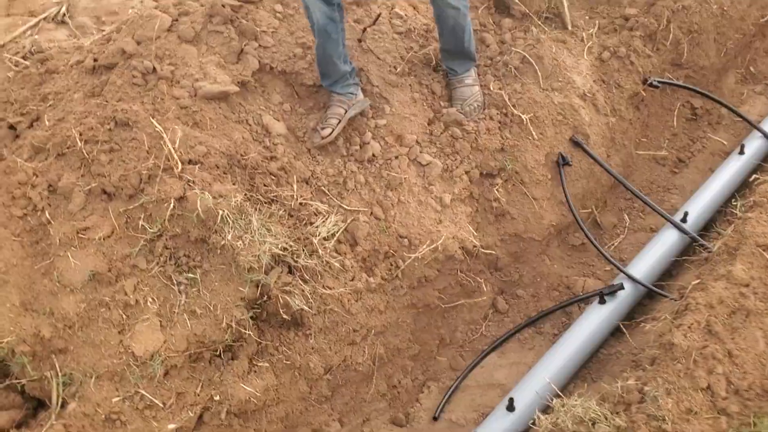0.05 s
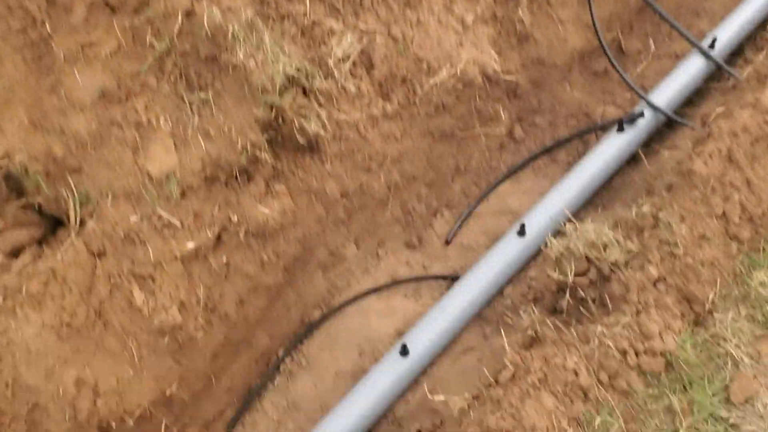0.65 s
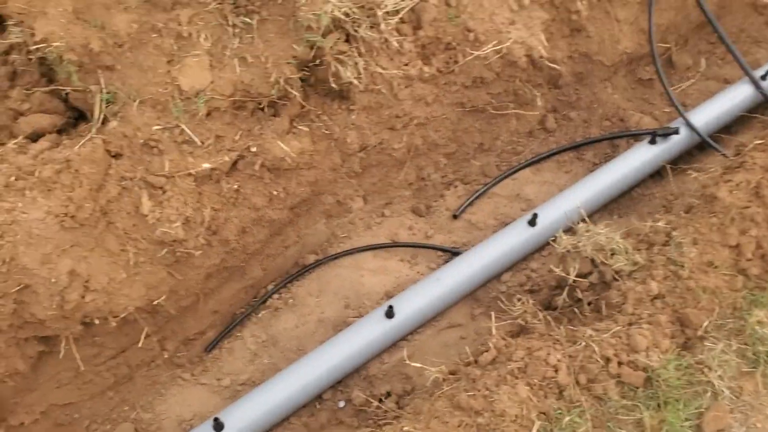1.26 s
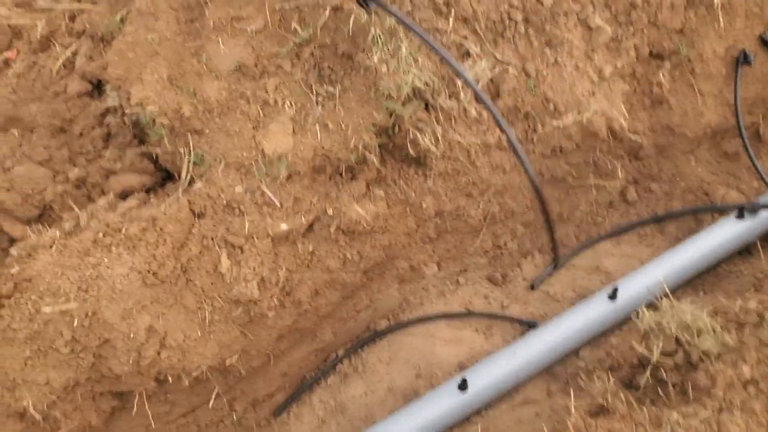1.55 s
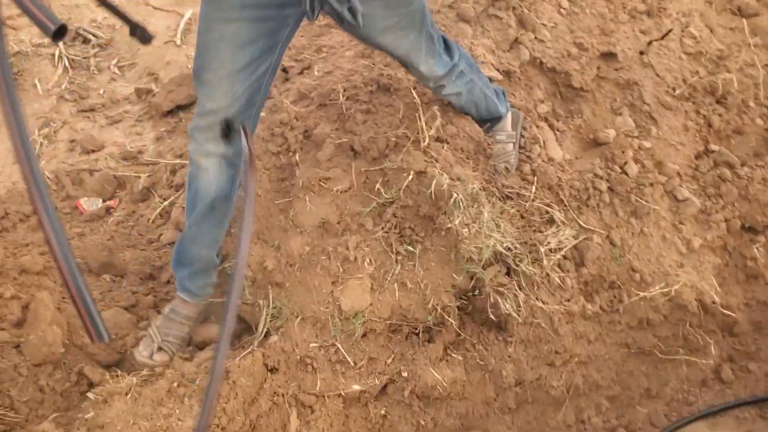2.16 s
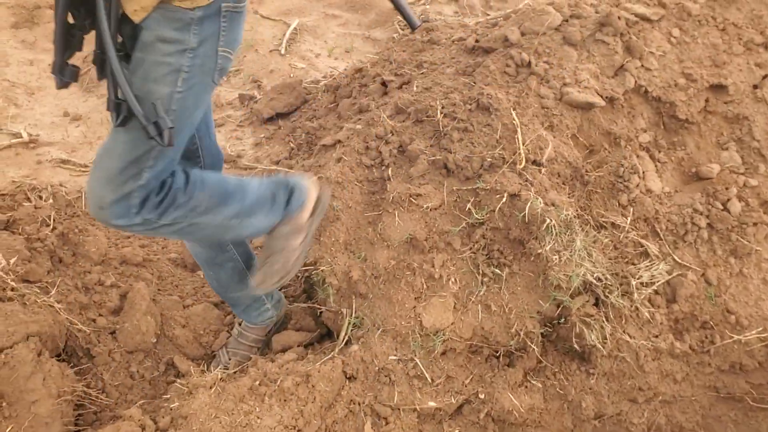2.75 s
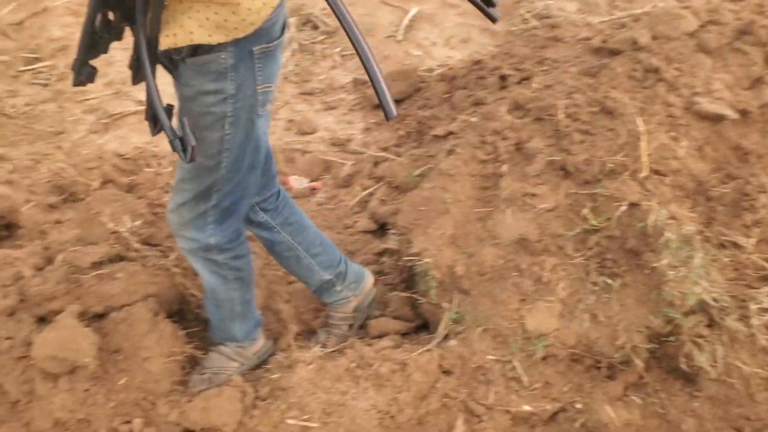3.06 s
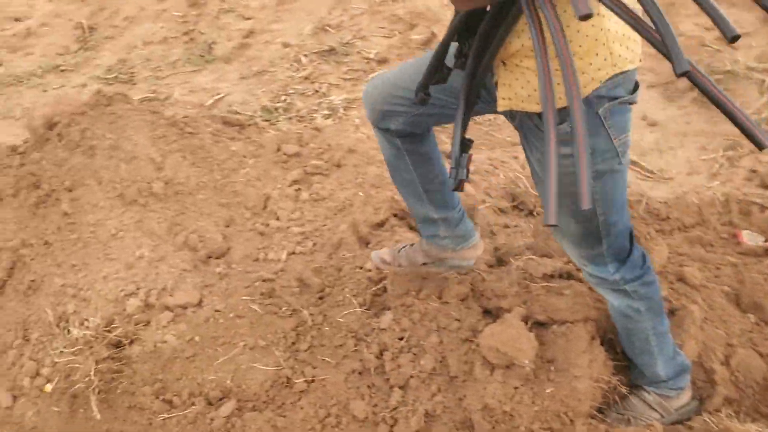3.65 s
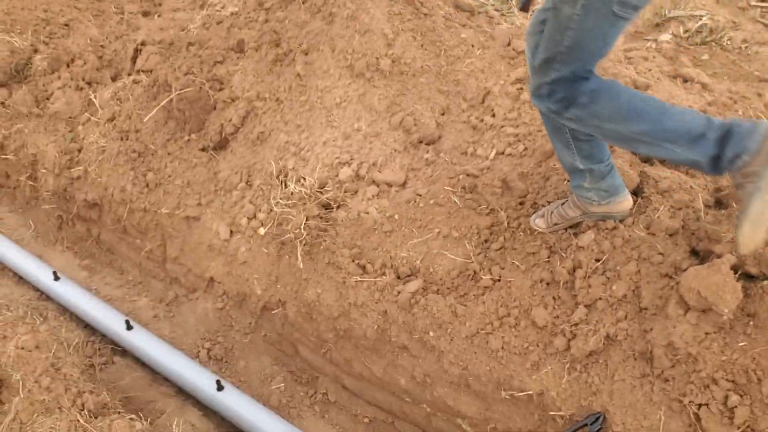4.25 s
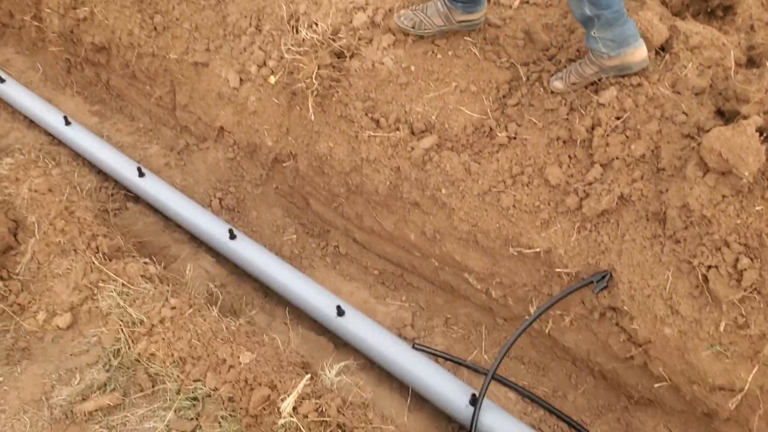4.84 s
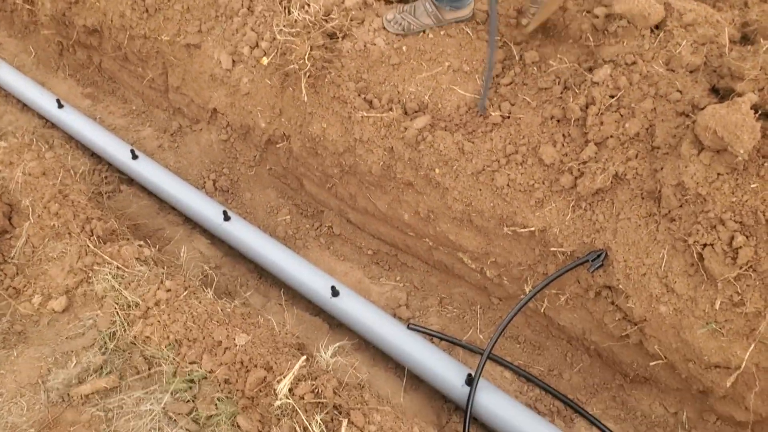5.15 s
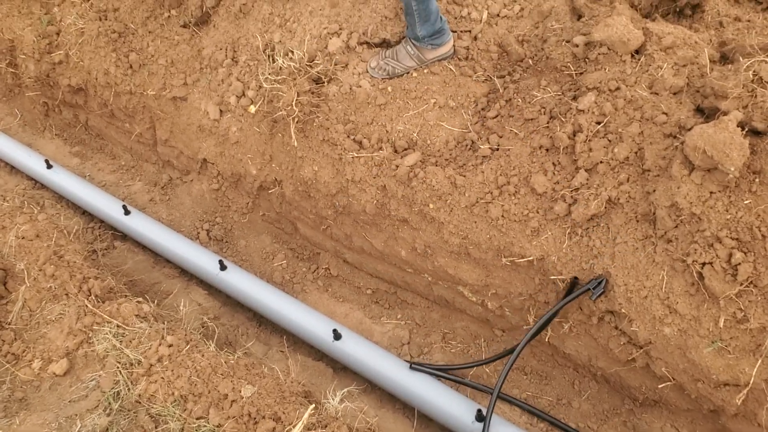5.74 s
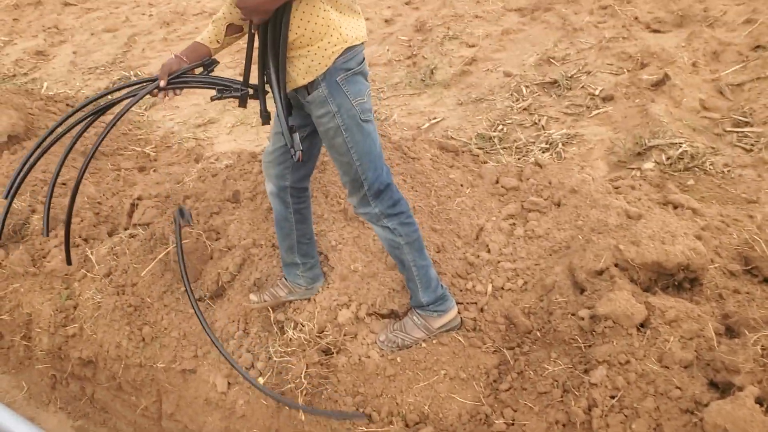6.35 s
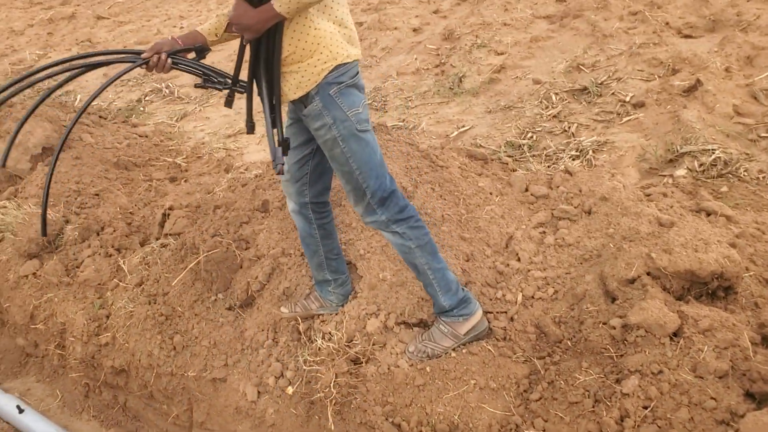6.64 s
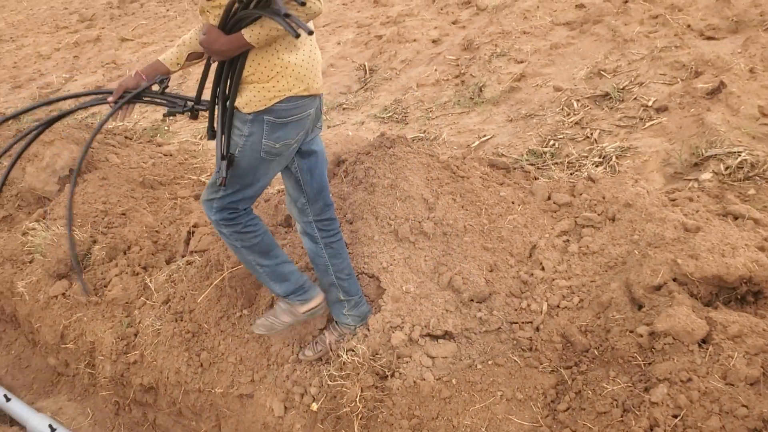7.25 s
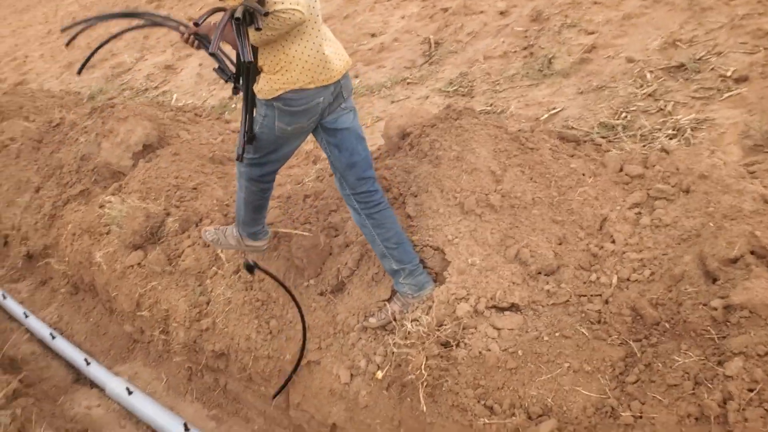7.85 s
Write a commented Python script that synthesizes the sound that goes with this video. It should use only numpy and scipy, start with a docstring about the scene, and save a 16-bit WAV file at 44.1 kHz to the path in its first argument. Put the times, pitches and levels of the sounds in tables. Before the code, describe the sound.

Wind buffets a phone microphone in an open, dry field, with a deep rumble on the left and a tearing flutter on the right. It starts in light puffs, swells into a strong gust, eases, then returns unevenly. Far beneath it, shoes scuff crumbly soil and carried plastic tubes rub and knock. Past the middle, a tube drops with faint ringing clicks and a brief scrape. There is no echo.

```python
"""Wind in a dry field

Gusts hit a phone's two microphone openings (ports): a deep rumble left, a tearing flutter right.
Under the wind, a worker crunches over crumbly soil with a bundle of plastic irrigation tubes.
The tubes rub and knock, and some drop with faint, ringing clicks.
The open field hisses softly, and there are no walls to echo."""
import sys
import numpy as np
from scipy import signal
from scipy.fft import rfft, irfft, next_fast_len
from scipy.io import wavfile
from scipy.ndimage import uniform_filter1d

SR = 44100
rng = np.random.default_rng(int(sys.argv[2]) if len(sys.argv) > 2 else 0)


def materialize(psi):
    """Save the field psi as 16-bit PCM at rate SR to the path in sys.argv[1].

    A 1-D psi becomes a single channel; in a 2-D psi each row is a channel.
    """
    bounded = np.clip(np.atleast_2d(psi).T, -1, 1)
    quanta = np.round(bounded * 32767).astype(np.int16)
    wavfile.write(sys.argv[1], SR, quanta)


N = 348390
TIME = np.arange(N) / SR
FFT_SIZE = 2 * next_fast_len(N // 2 + 1)
FREQS = np.maximum(np.fft.rfftfreq(FFT_SIZE, 1 / SR), 1)


def undb(db):
    """Turn decibels into a number to multiply by."""
    return np.exp(np.asarray(db) * np.log(10) / 20)


def unit(x):
    """Scale a signal to an average (rms) size of 1."""
    return x / np.sqrt(np.mean(x ** 2))


def curves(table):
    """Join a table's rows with straight lines in time, one curve per column."""
    times, *columns = np.transpose(table)
    return [np.interp(TIME, times, column) for column in columns]


def response(colour):
    """Turn a tone colour, given as (f/Hz, level/dB) points, into a gain at every frequency."""
    hz, db = np.transpose(colour)
    return undb(np.interp(np.log(FREQS), np.log(hz), db))


def shaped(x, gain):
    """Filter a signal by a gain at every frequency."""
    return irfft(rfft(x, FFT_SIZE) * gain)[..., :N]


def noise():
    """White noise: an even hiss."""
    return rng.standard_normal(N)


def wander(rate_hz):
    """A smooth random curve that strays about 1 from zero."""
    return unit(shaped(noise(), np.exp(-.5 * (FREQS / rate_hz) ** 2)))


def stereo_noise(gain, grains=1):
    """Separate filtered noise for each side, roughened by an optional loudness curve."""
    return np.array([unit(shaped(noise() * grains, gain)) for _ in range(2)])


def panned(x, pan_db):
    """Place a sound between the ports; pan is the left level minus the right."""
    return x * undb(np.array([[pan_db], [-pan_db]]) / 2)


def even(x, span_s):
    """Hold a signal's slow level at 1, keeping its quick bursts."""
    size = max(int(span_s * SR), 8)
    return x / np.sqrt(uniform_filter1d(uniform_filter1d(x ** 2, size), size) + 1e-12)


def swell(middle_s, length_s):
    """A bell-shaped rise and fall around one moment."""
    return np.exp(-2 * ((TIME - middle_s) / length_s) ** 2)


def puffs(depth_db, rate_hz):
    """Random changes of air speed, in dB; the air can drop a long way, but its peaks level off."""
    speed = wander(rate_hz)
    return depth_db * np.minimum(speed, 2 * np.tanh(np.maximum(speed, 0) / 2))


def surges(table, attack_s=0.0071, release_s=0.0093):
    """Each change in the air starts fast, holds and lets go; one curve per strength column."""
    change = np.zeros((len(table[0]) - 2, N))
    for start, length, *strengths in table:
        during = slice(int(start * SR), int((start + length + release_s) * SR))
        age = TIME[during] - start
        rise, fall = age / attack_s, 1 - (age - length) / release_s
        change[:, during] += np.outer(strengths, np.clip(np.minimum(rise, fall), 0, 1))
    return change


def rumble(colour, level_db, span_s):
    """Large swirls of air push slowly on a port, in uneven lumps."""
    lumps = undb(1.38 * wander(26))
    pressure = even(shaped(noise(), response(colour)), span_s)
    return unit(pressure * lumps) * undb(level_db)


def eddies(colour, level_db, slope_db, burst_db, burst_hz, flutter_db, flutter_hz, knee_hz):
    """Small swirls (eddies) come in bursts; above the knee, the treble falls by slope_db per octave."""
    bursts = even(noise() * undb(puffs(burst_db, burst_hz)), span_s=0.028)
    spectrum = rfft(bursts, FFT_SIZE) * response(colour)
    slope_db = np.minimum(slope_db, 0)
    flutter = puffs(flutter_db, flutter_hz)
    above_knee = np.clip(np.log2(FREQS / knee_hz), 0, 4)  # in octaves
    rush = 0
    for octave in np.arange(9) / 2:  # overlapping bands; the lowest holds all below the knee
        share = np.maximum(1 - 2 * np.abs(above_knee - octave), 0)
        band_db = slope_db * octave + flutter * min(octave, 2)  # the finest eddies flutter together
        rush = rush + irfft(spectrum * share)[:N] * undb(band_db)
    core = irfft(spectrum * ((FREQS > 250) & (FREQS < 600)))[:N]  # this band sets the level
    return rush / np.std(core) * undb(level_db)


REFERENCE_DB = -30.5  # eddies louder than this get brighter, quieter ones duller
# Tone colours of the rumble and the eddies on the left: f/Hz, level/dB
LEFT_RUMBLE_COLOUR = [(15, -28.5), (30, -33.5), (48, -1.5), (68, 0.5), (95, -2.5), (135, -9), (200, -18.5),
                      (320, -26), (600, -95)]
LEFT_EDDY_COLOUR = [(90, -25.5), (160, 8), (230, 5.5), (320, 0), (450, -3), (700, 2.5), (1100, 4.5),
                    (2000, -4.5), (4000, -33), (8000, -59)]
# Slow strength of the wind on the left: t/s, rumble level/dB, eddy level/dB
LEFT_STRENGTH = [(0.11, -27, -34), (1.154, -28, -39.5), (1.715, -20.5, -30), (2.477, -18.5, -39),
                 (2.798, -17, -26), (3.339, -22.5, -41.5), (3.481, -27, -50), (3.683, -19.5, -32.5),
                 (4.078, -25.5, -41), (5.309, -15, -33), (5.684, -23.5, -37.5), (6.14, -14.5, -29.5),
                 (6.528, -23.5, -49.5), (6.717, -18, -33.5), (7.401, -22, -44), (7.896, -11.5, -33)]


def left_wind(rumble_lift, eddy_lift, drop_db, slope_db):
    """Air rumbles deeply on the left port; faster air sheds finer eddies and sounds brighter."""
    rumble_db, eddy_db = curves(LEFT_STRENGTH)
    puff_db = puffs(depth_db=1.97, rate_hz=20) - drop_db
    eddy_db = eddy_db + eddy_lift + puff_db
    slope_db = slope_db + 0.27 * (eddy_db - REFERENCE_DB)
    low = rumble(LEFT_RUMBLE_COLOUR, rumble_db + rumble_lift + puff_db, span_s=0.046)
    return low + eddies(LEFT_EDDY_COLOUR, eddy_db + 0.65, slope_db, burst_db=5.5, burst_hz=69,
                        flutter_db=3.5, flutter_hz=35, knee_hz=376)


# Tone colours of the rumble and the eddies on the right: f/Hz, level/dB
RIGHT_RUMBLE_COLOUR = [(15, -24), (30, -25.5), (50, -0.5), (75, 4), (110, -8.5), (160, -4.5), (240, -10.5),
                       (400, -23.5), (700, -68)]
RIGHT_EDDY_COLOUR = [(90, -50), (160, -26.5), (230, -6.5), (320, 1), (450, 1.5), (700, 2), (1100, -0.5),
                     (1700, -5), (3850, -13.5), (4300, -19.5), (5200, -25.5), (8000, -44)]
# Slow strength of the wind on the right: t/s, rumble level/dB, eddy level/dB
RIGHT_STRENGTH = [(0.113, -45, -33.5), (0.696, -59, -35), (1.06, -42, -36), (1.468, -48, -30.5),
                  (1.479, -18, -18), (1.58, -20.5, -13.5), (1.65, -23.5, -15.5), (2.04, -29.5, -20),
                  (2.13, -25.5, -19), (2.46, -23.5, -19.5), (2.56, -27, -25), (2.77, -20.5, -21),
                  (2.93, -28.5, -26), (3.132, -32, -25), (3.362, -28.5, -21), (3.47, -35, -21),
                  (3.53, -31, -26), (3.752, -33, -33.5), (4.086, -35.5, -43), (5.066, -34.5, -39),
                  (5.14, -27, -30.5), (5.265, -29, -22), (5.524, -28.5, -30.5), (5.63, -37, -41),
                  (5.8, -61, -61), (5.83, -40, -48), (5.98, -29, -34.5), (6.02, -37, -31.5),
                  (6.627, -35.5, -36), (6.83, -25.5, -26), (6.95, -27, -25), (7.5, -30, -27.5),
                  (7.902, -34, -30)]
# Soft, low puffs that come one by one in light air: middle t/s, length/s, level/dB
LOW_PUFFS = [(0.107, 0.049, -26), (0.222, 0.028, -22), (0.275, 0.046, -32), (0.33, 0.029, -30),
             (0.513, 0.03, -31), (0.585, 0.0083, -30), (0.794, .012, -31), (0.89, .025, -28),
             (0.923, 0.065, -34), (1.006, 0.014, -25), (1.068, 0.016, -20), (1.11, 0.026, -29),
             (1.21, 0.061, -34), (1.33, 0.02, -22)]
# Light air puffs and crackles, a strong gust rushes: t/s, puff depth/dB, flutter/(dB per octave)
AIR_UNSTEADINESS = [(.2, 1, 2.2), (1.44, 4, 1.3), (1.5, -0.35, 0.9), (2.4, 0.5, 1.4), (2.7, 0.5, 2.6),
                    (3.35, 0.9, 1.0), (4.1, 0, 7.5), (6.6, 0, -2.8), (6.9, 1.2, 2), (7.7, 1.5, 2.5)]


def right_wind(lift_db, slope_db, rasp):
    """Air tears and flutters across the right port; a rasp makes it both brighter and louder."""
    rumble_db, eddy_db = curves(RIGHT_STRENGTH)
    depth_db, flutter_db = curves(AIR_UNSTEADINESS)
    eddy_db = eddy_db + lift_db
    slope_db = slope_db + rasp + 0.28 * (eddy_db - REFERENCE_DB)
    puff_db = puffs(depth_db, rate_hz=11)
    push = undb(rumble_db) + sum(undb(db) * swell(s, length) for s, length, db in LOW_PUFFS)
    low = push * rumble(RIGHT_RUMBLE_COLOUR, lift_db + puff_db, span_s=0.011)
    eddy_db = eddy_db + puff_db + 0.65 * rasp
    return low + eddies(RIGHT_EDDY_COLOUR, eddy_db, slope_db, burst_db=3, burst_hz=210,
                        flutter_db=flutter_db, flutter_hz=140, knee_hz=422.4)


# Short shoves of air: start t/s, length/s, left rumble lift/dB, left eddy lift/dB, right lift/dB
GUSTS = [(.1, 0.027, 1.5, -1, 8.5), (.247, 0.026, 4, 5.5, 7), (.842, 0.17, 2, -1, 2),
         (.9, 0.043, -11, 9, 2.5), (1.105, 0.043, -2, 6.5, 3), (1.311, 0.045, 8.5, 0, 0),
         (1.551, 0.12, 5.5, 4, -2.5), (2.05, 0.066, 3, 8, 2.5), (2.526, 0.053, 7, 8, 3),
         (2.746, 0.16, 3.5, 3, -1.5), (2.982, 0.028, -10, 9.5, -0.5), (3.153, 0.043, 7, 13.5, 2.5),
         (3.251, 0.049, 8, 1, 0), (3.865, 0.066, 3.5, 11, 2), (4.225, 0.21, 2, 9, 1.5),
         (4.235, .1, 5, 1.5, 0), (4.647, 0.16, 4.5, 7, 8.5), (4.917, 0.11, 5.5, 5, 1),
         (5.1, 0.037, 1.5, 8.5, 4.5), (5.298, 0.055, 4, -4, -3), (5.577, 0.06, 5, 6, -4),
         (5.805, 0.03, -2, 11, 8), (5.985, 0.051, -6, -7, 3.5), (6.055, 0.057, 3, -6, -2.5),
         (6.118, 0.21, 1.5, 3, 6), (6.22, 0.015, -6, -5, 8), (6.28, 0.052, -1.5, 7.5, 3.5),
         (6.709, 0.054, 6, 1, -1.5), (7.135, 0.048, 10.5, 7, -1.5), (7.28, 0.039, 5.5, -4, -0.5),
         (7.63, 0.076, 3.5, 11, 1.5), (7.712, 0.062, -1.5, 4, 8)]
# Moments when the air lets go: start t/s, length/s, left drop/dB, right drop/dB
AIR_LULLS = [(.16, 0.1, 5.5, 6.5), (.292, 0.021, 7, 8), (.575, 0.023, 12, 5.5), (.597, .045, 1, 1),
             (.872, 0.013, -1, 12), (.975, 0.08, 3, 3), (1.036, 0.069, 3, 6), (1.152, 0.0094, 4, 2),
             (1.24, 0.037, 6, 4), (1.352, 0.011, 1, 14), (1.617, 0.0093, 1, 2), (2.046, 0.016, 3, 5.5),
             (2.505, 0.014, -2, 11), (3.135, 0.021, 4, 4), (3.585, .008, 0, 5), (4.043, 0.047, 6.5, 5.5),
             (4.805, 0.11, 1, -4), (4.862, 0.058, 12, 3), (5.05, 0.036, 6, 1), (5.34, 0.036, 5.5, 8),
             (5.505, 0.058, 8, -3), (5.77, 0.039, -1.5, 3), (5.9, 0.074, 1.5, 9), (6.332, 0.03, 0, 6),
             (7.59, 0.038, 2, -3.5), (7.782, 0.02, 13.5, 1)]
# Rasps as fast air tears past; a lift below zero dulls the sound:
# start t/s, length/s, left slope lift/(dB per octave), right slope lift/(dB per octave)
AIR_RASPS = [(.396, 0.028, 4, 3.5), (.452, 0.013, 6, 2), (.483, 0.02, 8, 1), (.7, .016, 2, 2.5),
             (.74, .03, 2, 2), (0.852, 0.014, 8, 5), (.945, 0.007, 9, 1.5), (1.116, 0.028, 9.5, 0),
             (1.373, 0.0074, 3, 2), (1.425, 0.026, 1, 1.5), (1.474, 0.0025, 0, 2.5),
             (1.535, .028, -6, 1.34), (1.71, 0.033, -1, 0.56), (1.768, 0.029, 6, 1.5),
             (1.815, 0.015, -1, 1.5), (1.929, 0.025, -1, 2.5), (2.02, 0.015, 0, 2.6),
             (2.07, 0.039, 10.5, -2), (2.22, 0.016, -7, 2), (2.256, .02, -3, 0.5), (2.35, 0.023, -4, 0.5),
             (2.609, 0.012, 0, 3), (2.748, 0.1, 1, 4.5), (2.869, 0.014, 2, 5.5), (2.888, .006, 4, 6),
             (2.918, 0.015, 0, 2.5), (3.003, 0.013, 9.5, 4.5), (3.046, 0.027, 3, 3.5),
             (3.233, 0.032, -3, 1), (3.331, 0.018, 7, 4.5), (3.35, 0.0068, -4, 5.5), (3.4, .014, 10, 2.5),
             (3.424, 0.0073, 9, 2.5), (3.452, 0.0041, 10, 3.5), (3.574, 0.0087, -2, 4.5),
             (3.601, 0.037, -5, 3), (3.645, 0.0046, 0, 5.5), (5.805, .045, -2.5, 3), (7.713, 0.025, -2, 4),
             (7.812, 0.018, -8, 5)]
# How steeply the treble falls as the phone turns: t/s, left/(dB per octave), right/(dB per octave)
TREBLE_SLOPE = [(.28, -16.5, -15), (.45, -17.5, -10), (.73, -18, -8), (.88, -20.5, -14.5),
                (1.03, -16.5, -13), (1.25, -20, -10), (1.45, -20.5, -11.5), (1.9, -30, -10.5),
                (2.42, -22, -12), (2.56, -17, -15), (3.1, -21.5, -16.5), (3.2, -24, -12), (3.4, -17, -12),
                (4.4, -25.5, -20), (5.3, -25.5, -21), (7.6, -18, -18), (7.73, -20, -20)]


def wind():
    """Each port sits in its own swirling air; gusts, lulls and rasps ride on a slow flow."""
    rumble_lift, eddy_lift, right_lift = surges(GUSTS)
    left_drop, right_drop = surges(AIR_LULLS)
    left_rasp, right_rasp = surges(AIR_RASPS, attack_s=0.0015, release_s=0.0015)
    left_slope, right_slope = curves(TREBLE_SLOPE)
    left = left_wind(rumble_lift, eddy_lift, left_drop, left_slope + left_rasp)
    right = right_wind(right_lift - right_drop, right_slope, right_rasp)
    return np.array([left, right])


# Loudness of the field's hiss on the right: t/s, level/dB
GRASS_LEVEL = [(.11, -62.5), (1.2, -75), (3.6, -58), (4.3, -59), (5.1, -52), (5.7, -53), (7.0, -50.5),
               (7.9, -52.5)]
# Tone colour of that hiss: f/Hz, level/dB
GRASS_COLOUR = [(100, 9.5), (600, -10), (1400, 1), (2200, 1.5), (3000, 2), (3900, -3), (4900, -4.5),
                (6500, -11.5), (9000, -14), (12000, -18), (16000, -4)]


def field_hiss(left_db, flicker_db):
    """Air hisses softly over dry grass all around, stronger on the right."""
    level_db, = curves(GRASS_LEVEL)
    colour = response(GRASS_COLOUR)
    air = np.array([unit(shaped(noise(), colour)) * undb(flicker_db * wander(11)) for _ in range(2)])
    return air * undb(level_db) * undb([[left_db], [0]])


def microphone_hiss():
    """Each microphone makes a faint, steady hiss of its own."""
    return np.array([noise(), noise()]) * undb([[-78], [-69]])


TUBE_PITCH_HZ = 3010  # pitch of the tube below; shorter and longer tubes scale from here
# The tones at which a plastic tube rings while held in the bundle: f/Hz, width/Hz, level/dB
TUBE_TONES = [(1570, 540, 6), (2920, 1460, 11), (4240, 300, 0.5), (6200, 590, -16)]


def tube_body(hz, pitch_hz=TUBE_PITCH_HZ, ring=1):
    """A tube acts as a filter that favours its own tones; narrower tones ring longer."""
    return sum(undb(db) / (1 + 2j * (hz - f * pitch_hz / TUBE_PITCH_HZ) * ring / width)
               for f, width, db in TUBE_TONES)


# Tubes knocking together and landing:
# t/s, knock level/dB, tick level/dB, pan/dB, pitch f/Hz, ring time/(that of a held tube)
TUBE_HITS = [(0.162, -38, -53, -6, 2690, 1), (1.032, -59, -72, -9, 3080, 8),
             (1.587, -61, -51.5, -2, 2940, 1), (1.757, -70, -47.5, -3, 2920, 1),
             (2.417, -50, -55.5, 13, 2940, 1), (2.526, -40.5, -45.5, -2, 4050, 1.5),
             (2.767, -41, -50, -2, 2940, 1), (2.806, -44, -50, 9, 2940, 1), (2.818, -50, -55, 7, 2940, 1),
             (3.433, -43, -52, -3, 4700, 3), (3.462, -43, -51, -3, 4600, 3), (3.822, -53, -57, -2, 3000, 1),
             (3.993, -52, -53, -9, 2960, 2), (4.279, -59, -63, 3, 2940, 1), (5.176, -46, -64, -6, 3130, 3),
             (5.237, -44.5, -56, -9, 4200, 1.2), (5.246, -39, -59, -6, 3540, 2.5),
             (5.3, -56, -56, -15, 4470, 2), (5.359, -53, -61, -18, 2940, 1),
             (5.426, -49, -56, -18, 3940, 1), (5.444, -36.5, -54, -6, 3070, 14),
             (5.461, -42, -65, 3, 2940, 2), (5.584, -40, -52, -1, 2930, 4), (5.63, -47, -53, 12, 2860, 2),
             (5.644, -46, -52, 6, 2850, 1), (5.691, -45, -62, 2, 2900, 1.5), (5.842, -48, -72, -9, 2960, 7),
             (6.525, -43, -60, -6, 3100, 2), (6.559, -51, -66, -13, 3200, 3),
             (6.702, -40.5, -53, 2, 5200, 1), (6.709, -47, -57, -1, 5700, 1), (6.769, -51, -65, 1, 2920, 1),
             (6.792, -45.5, -64, 1, 2940, 1), (6.842, -46.5, -54, -5, 4800, 1.5),
             (6.878, -41.5, -53, -1, 2800, 4), (7.005, -51, -70, -4, 2780, 6),
             (7.081, -50, -67, 10, 2740, 4), (7.255, -45.5, -74, 2, 2860, 4)]


def tube_clicks(knock_s, tick_s, knock_trim_db, tick_trim_db):
    """Each hit rings a tube at its own pitch, longer if it lies free, and adds a gritty tick."""
    t = TIME[:8192]
    hz = np.fft.rfftfreq(len(t), 1 / SR)
    snap = 1 + undb(-1) * np.exp(-t / 0.00096)  # the first hard touch
    treble_only = (1j * hz / (5000 + 1j * hz)) ** 2
    onset = t < .008  # the first 8 ms set the level
    clicks = np.zeros((2, N + len(t)))
    for s, knock_db, tick_db, pan_db, pitch_hz, ring in TUBE_HITS:
        contact, grit = rng.standard_normal((2, 2, len(t))) * snap
        knock = irfft(rfft(contact * np.exp(-t / knock_s)) * tube_body(hz, pitch_hz, ring))
        tick = irfft(rfft(grit * np.exp(-t / tick_s)) * treble_only)
        knock *= undb(knock_db + knock_trim_db) / np.std(knock[:, onset])
        tick *= undb(tick_db + tick_trim_db) / np.std(tick[:, onset])
        start = int(s * SR)
        clicks[:, start:start + len(t)] += panned(knock + tick, pan_db)
    return clicks[:, :N]


# Single large eddies that hit the ports:
# t/s, left push level/dB, width/ms, right minus left/dB, damping (more stops the ringing sooner)
AIR_SLAPS = [(0.271, -12.5, 0.72, 1, 0.69), (0.926, -18, 0.65, 6, 1), (1.127, -12, 0.85, 0.5, 0.98),
             (2.812, -1, 0.17, -21, 1), (3.159, -5.5, 0.4, -32, 1), (4.787, -4, 0.78, -18, 0.89),
             (5.925, 1.5, 0.41, -25, 1), (5.979, -8.5, 0.48, -32, 0.73), (7.141, -4, 3, -29, 0.39),
             (7.664, -3.5, 2.4, -33, 0.27), (7.857, -11, 0.36, -28, 0.89)]


def wind_slaps(ring_hz):
    """A pulse of air hits the ports; the microphone's bass cut makes it swing back and ring."""
    w = 1j * FREQS / ring_hz
    slaps = 0
    for s, db, width_ms, right_db, damping in AIR_SLAPS:
        push = np.exp(-.5 * ((TIME - s) * 1000 / width_ms) ** 2)
        bass_cut = w ** 2 / (w ** 2 + damping * w + 1)
        slaps = slaps + undb([[db], [db + right_db]]) * shaped(push, bass_cut)
    return slaps


# Shoes scuffing dry soil: middle t/s, length/s, level/dB, pan/dB
SHOE_SCUFFS = [(1.303, 0.49, -64, -15), (2.167, 0.025, -54, -4), (2.341, 0.054, -50, -3),
               (2.493, 0.066, -49.5, -4), (2.79, 0.14, -54, -8), (3.033, 0.066, -51, -7),
               (4.118, 0.19, -58, -5), (5.055, 0.24, -59, 1), (5.374, .02, -52, -14),
               (5.439, 0.02, -42.5, -12), (5.526, 0.062, -53, -16), (6.92, 0.3, -55.5, -4),
               (7.587, 0.11, -55, -8)]


def shoes(grain_db, trim_db):
    """Crumbs of soil crush under a sole: a swell of tiny dry grains."""
    colour = response([(300, -21.5), (1500, 13), (4000, 6.5), (7000, 1), (12000, -3), (16000, 17)])
    grit = stereo_noise(colour, grains=undb(grain_db * wander(500)))
    return grit * sum(panned(undb(db + trim_db) * swell(s, length), pan_db)
                      for s, length, db, pan_db in SHOE_SCUFFS)


# Swings of the carried tubes: middle t/s, length/s, level/dB
BUNDLE_SWINGS = [(2.452, 1, -53), (4.052, 0.098, -55), (4.946, 0.27, -59), (5.61, 0.23, -51),
                 (6.624, 0.25, -54)]


def bundle(grain_db, sway_db, left_db, taps_per_s, tap_s, tap_db):
    """With each swing the tubes rub and now and then tap lightly; both keep them ringing."""
    motion = sum(undb(db) * swell(s, length) for s, length, db in BUNDLE_SWINGS)
    body = tube_body(FREQS) ** 2
    slips = undb(grain_db * wander(300) + sway_db * wander(14))
    rub = stereo_noise(body, grains=slips)
    contacts = (rng.random(N) < taps_per_s / SR).astype(float)
    fades = signal.lfilter([1], [1, -np.exp(-1 / (tap_s * SR))], contacts)  # each tap dies away
    taps = unit(shaped(noise() * fades, body))
    return (rub + taps * undb(tap_db)) * motion * undb([[left_db], [0]])


# Tone colour of fine dust under a shoe: f/Hz, level/dB
DUST_COLOUR = [(2500, -23), (4200, -1), (5200, 5.5), (7000, -16), (10000, -13), (13500, 4), (16000, 7.5)]


def sole_slide(middle_s, length_s, level_db, pan_db):
    """Fine dust hisses under a sliding sole."""
    dust = stereo_noise(response(DUST_COLOUR))
    return panned(dust * undb(level_db) * swell(middle_s, length_s), pan_db)


# A dropped tube skidding and bouncing: middle t/s, length/s, level/dB, pan/dB
TUBE_SKIDS = [(5.633, 0.0073, -47, 9), (5.649, 0.021, -45, -4), (5.709, 0.043, -48, -5)]
# Tone colour of its scrape: f/Hz, level/dB
SCRAPE_COLOUR = [(500, -5), (1000, 2), (1380, -1), (2000, -17), (2850, -8), (4500, -19), (9000, -25)]


def tube_skids(grain_db):
    """The end of a dropped tube ploughs through loose dirt: a dull, hollow scrape."""
    scrape = stereo_noise(response(SCRAPE_COLOUR), grains=undb(grain_db * wander(300)))
    return scrape * sum(panned(undb(db) * swell(s, length), pan_db)
                        for s, length, db, pan_db in TUBE_SKIDS)


def scene():
    """Wind on the ports, over the small sounds of the work and a faint hiss."""
    work = tube_clicks(knock_s=0.0076, tick_s=0.0035, knock_trim_db=-5, tick_trim_db=-3.5)
    work += bundle(grain_db=3, sway_db=6, left_db=-16, taps_per_s=8.7, tap_s=0.004, tap_db=-15.5)
    work += shoes(grain_db=5, trim_db=2)
    work += sole_slide(middle_s=4.52, length_s=0.21, level_db=-58, pan_db=-12)
    work += tube_skids(grain_db=3.5)
    hiss = microphone_hiss()
    air = wind() + wind_slaps(ring_hz=69) + field_hiss(left_db=-8.5, flicker_db=1.5)
    return air + work + hiss


# How the ports boost or cut the treble: f/Hz, left level/dB, right level/dB
PORT_TREBLE = [(5040, 0, 1), (6350, -3, 3), (7500, -4, -4.5), (8540, 11, -10), (9800, 5.5, -1.5),
               (11140, 8, 3.5), (13000, -3.5, 1), (15750, -9.5, -11)]


def record(dry):
    """The ports colour the treble and round off the hardest slaps; the very top is cut away."""
    start_s, top_hz = 0.112, 15800
    hz, *ports_db = np.transpose(PORT_TREBLE)
    coloured = np.array([shaped(side, response(np.c_[hz, db])) for side, db in zip(dry, ports_db)])
    rounded = coloured / (1 + (coloured / .9) ** 6) ** (1 / 6)
    fade_in = np.clip((TIME - start_s) / .002, 0, 1)  # the sound sets in after a short silence
    top_cut = signal.ellip(10, .2, 80, top_hz, fs=SR, output="sos")
    return signal.sosfilt(top_cut, rounded * fade_in)


dry = scene()
out = record(dry)
materialize(out)
```